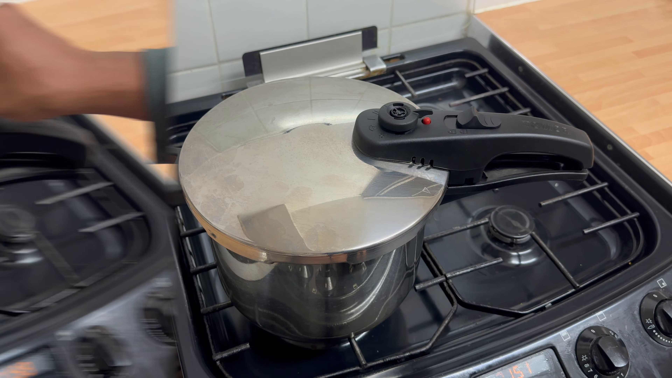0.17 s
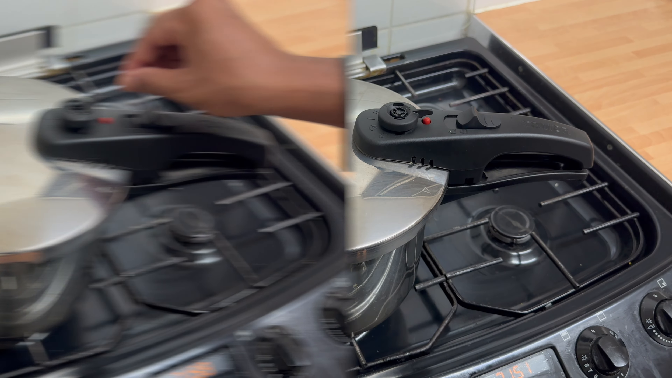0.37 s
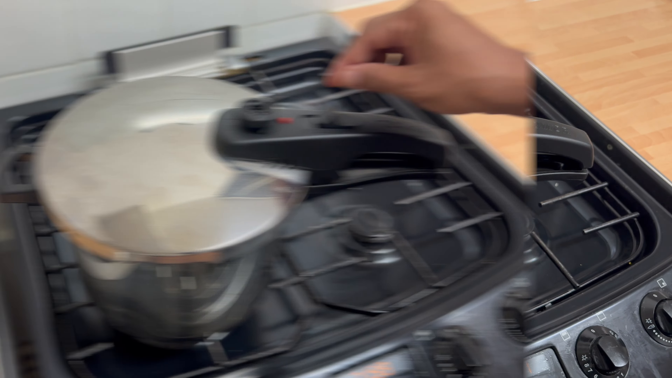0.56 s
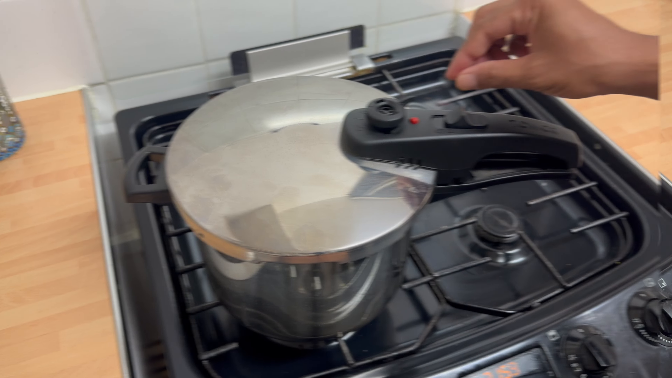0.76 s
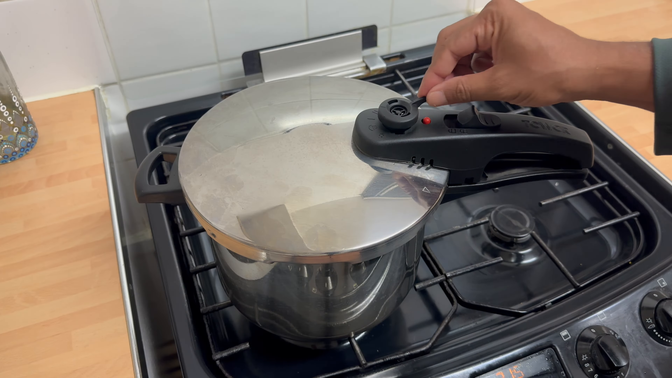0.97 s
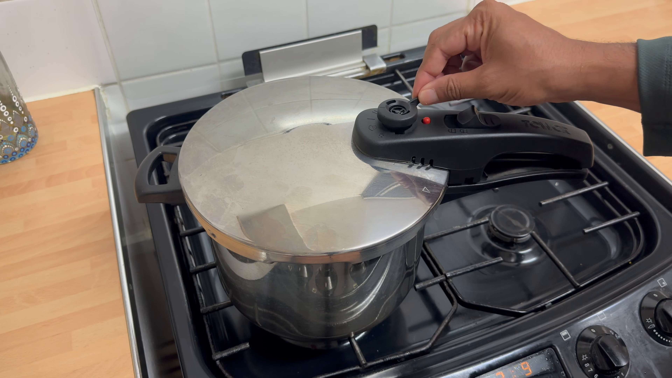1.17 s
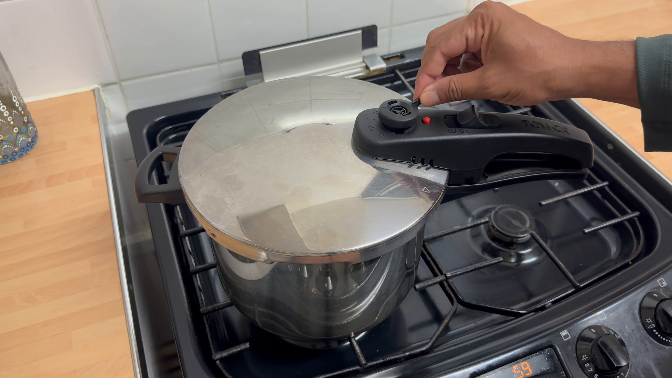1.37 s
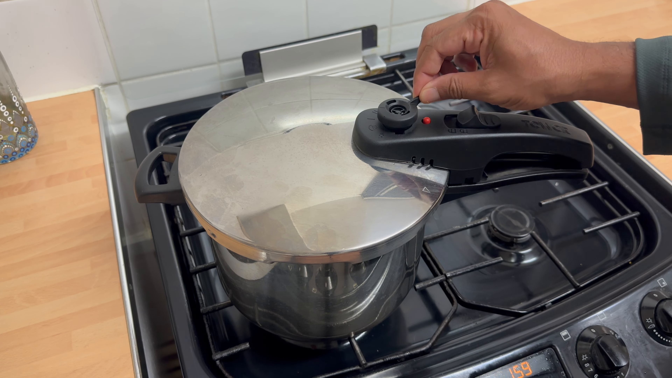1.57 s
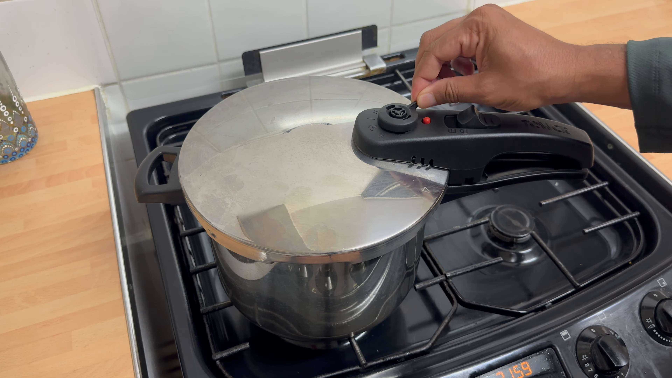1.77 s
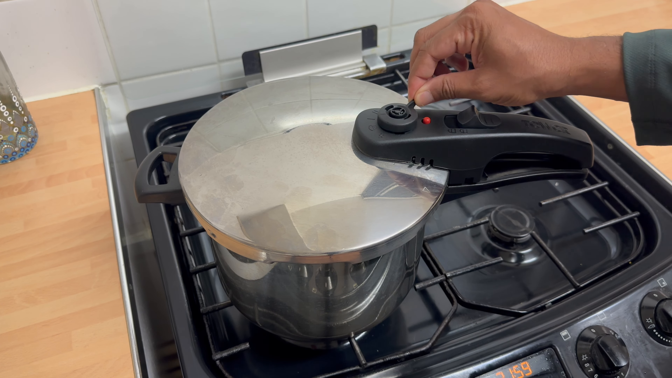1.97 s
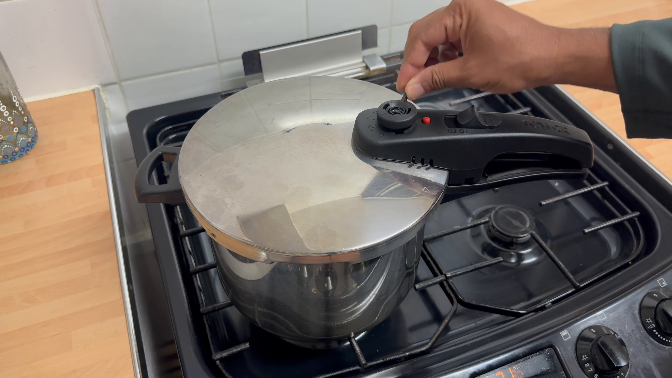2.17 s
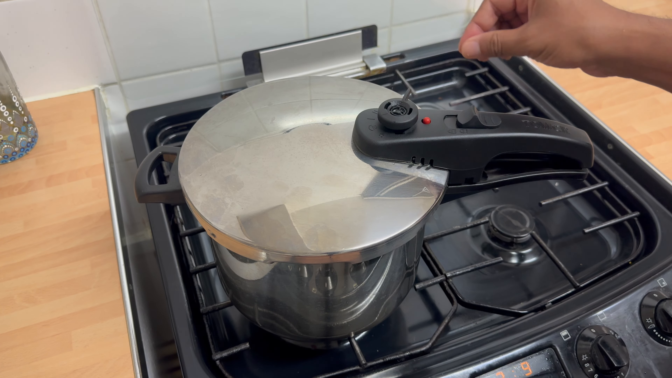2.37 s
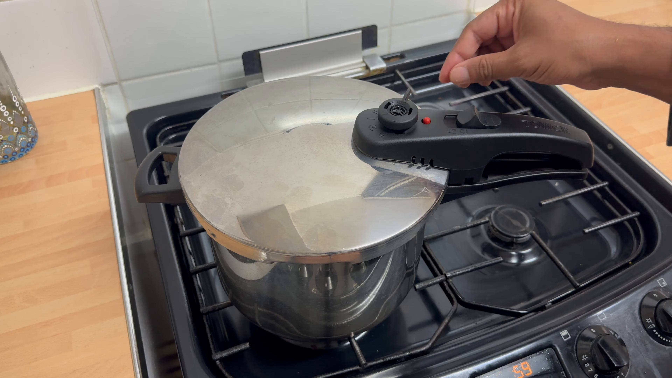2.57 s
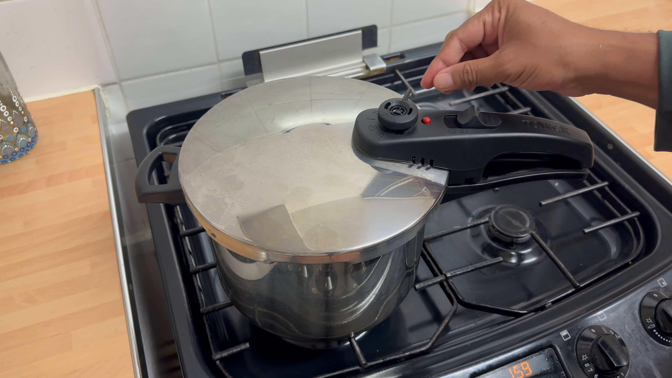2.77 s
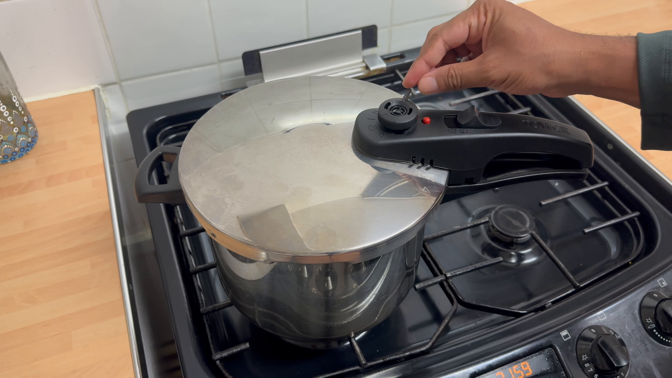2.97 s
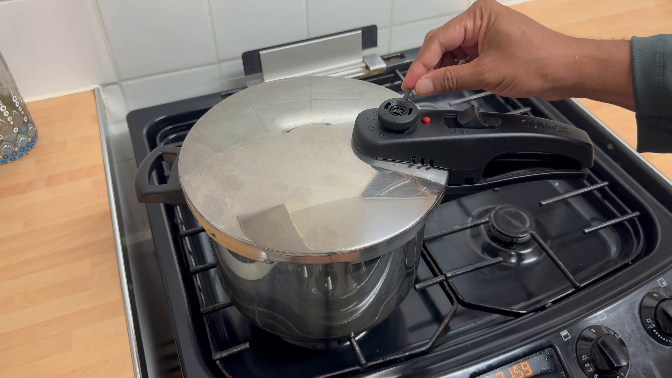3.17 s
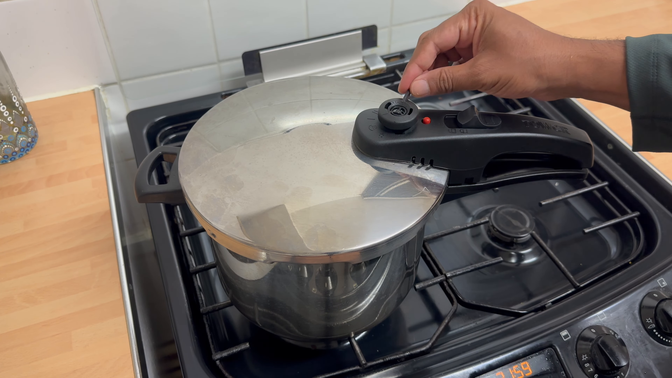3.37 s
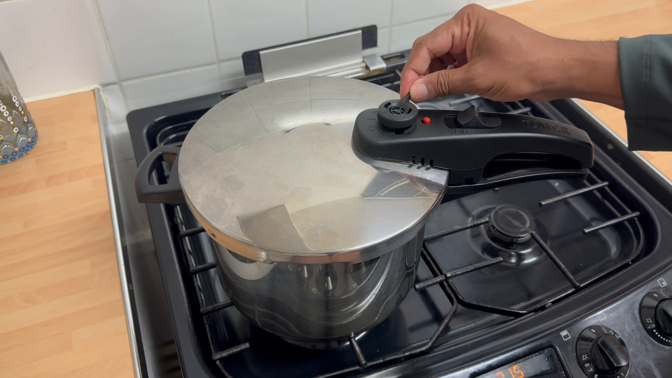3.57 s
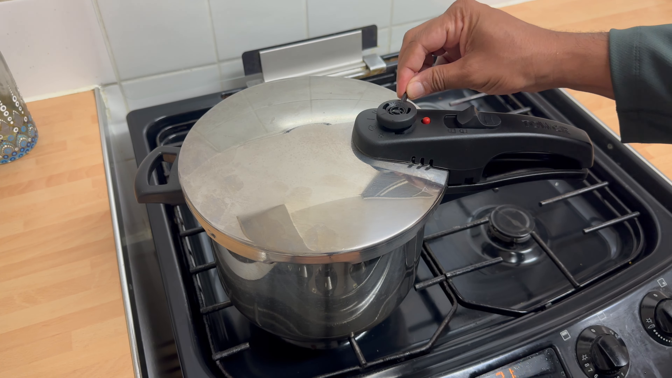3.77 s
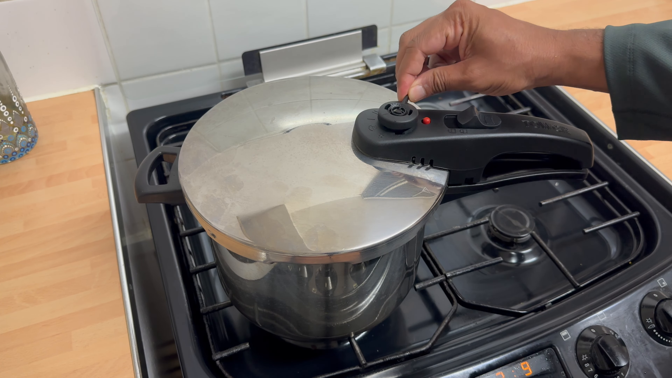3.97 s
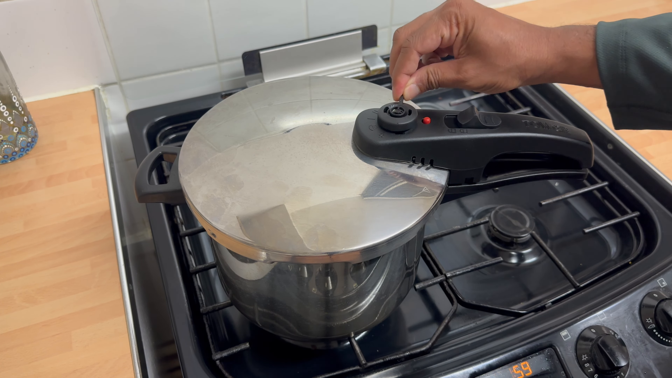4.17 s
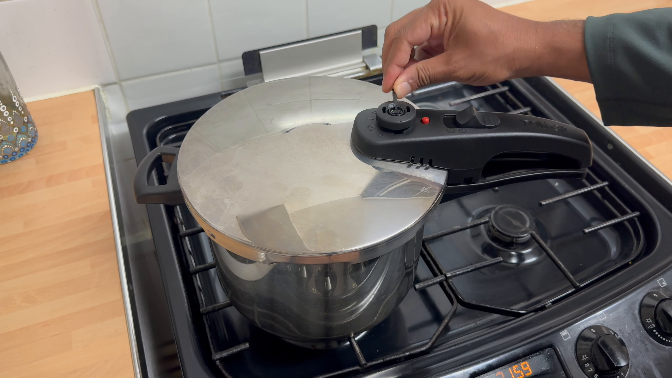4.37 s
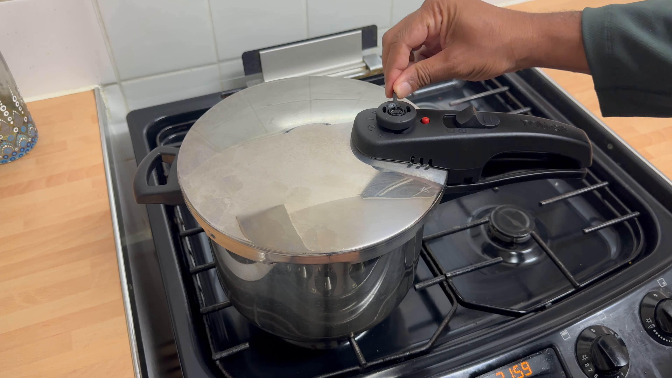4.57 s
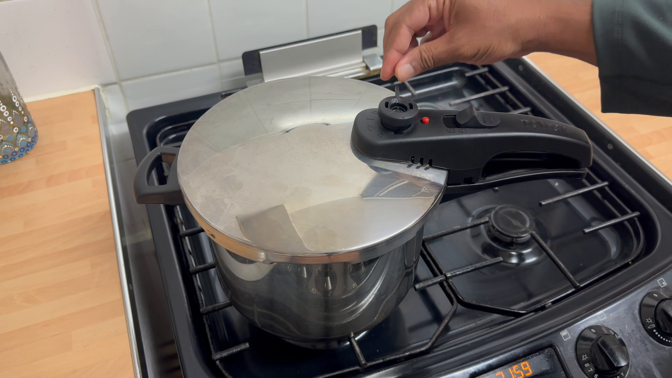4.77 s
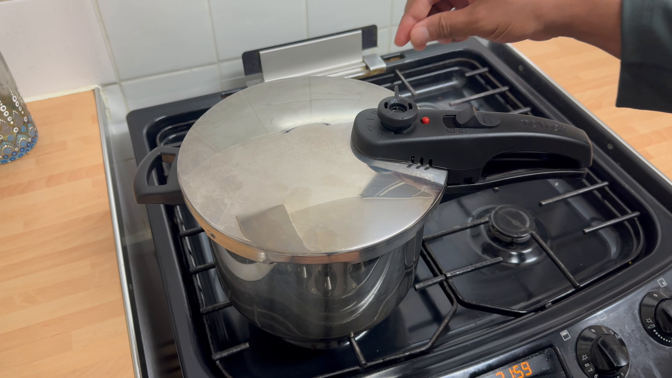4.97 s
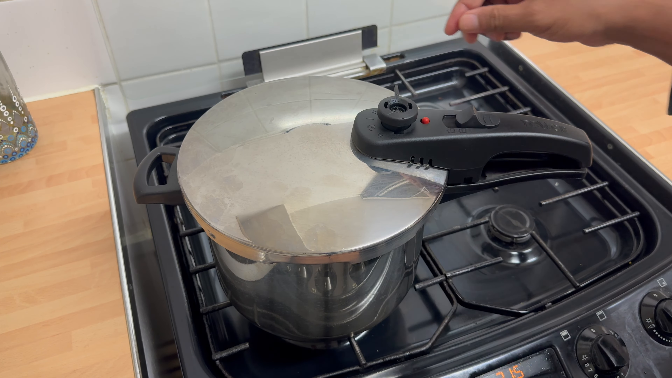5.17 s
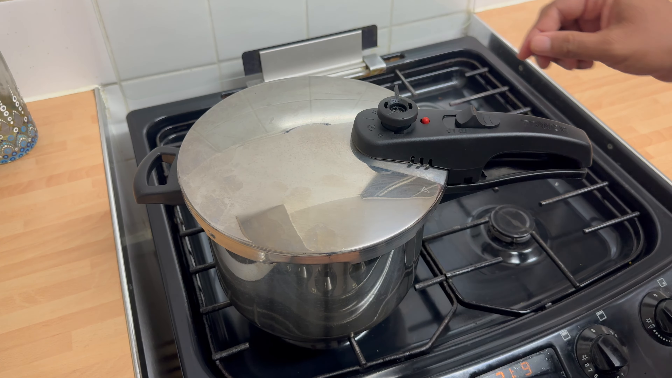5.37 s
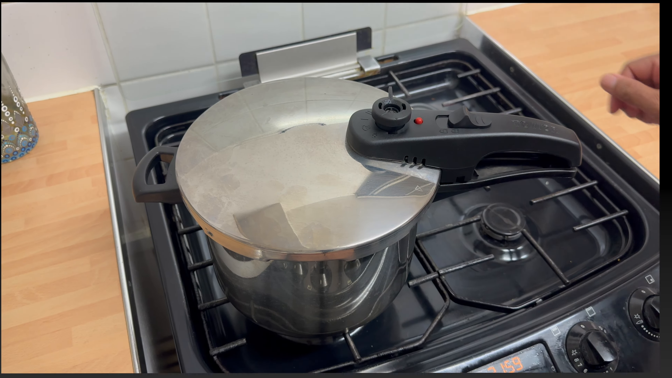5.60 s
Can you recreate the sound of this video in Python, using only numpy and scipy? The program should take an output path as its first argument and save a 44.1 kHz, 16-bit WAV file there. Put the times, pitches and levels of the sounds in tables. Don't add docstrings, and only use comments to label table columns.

```python
import sys
import numpy as np
from scipy import signal
from scipy.fft import rfft, irfft
from scipy.io import wavfile

SR = 44100
rng = np.random.default_rng(int(sys.argv[2]) if len(sys.argv) > 2 else 0)


def gain_from_db(level_db):
    decades = np.asarray(level_db, float) / 20
    return 10 ** decades


def store_pcm(level_fs):
    pcm = np.round(np.clip(level_fs, -1, 1) * 32767).astype(np.int16)
    wavfile.write(sys.argv[1], SR, np.atleast_2d(pcm).T)


N = 248616

# t/s, lift off its seat (about -2 to 2), turn of the cap, cover by the hand (each about -1
VALVE_POSE = [(0, -0.87, -0.61, -0.81), (.35, -0.93, -0.6, 0.23), (.75, -0.52, -0.74, -0.98),
              (1.15, -0.82, 0, 0.88), (1.3, -0.77, -0.12, 1), (1.42, -0.51, -0.12, 0.63),
              (1.65, -1.64, -0.3, 1), (1.87, -0.096, 0.66, 0.47), (2.0, -1.3, 0.28, 0.28),
              (2.05, 1.9, -0.43, -0.22), (2.19, 0.16, 0, 0.25), (2.4, 0.64, 0.18, -1.2),
              (3.4, 0.13, 0.4, -0.27), (3.7, -0.31, 0.35, -0.077), (4.35, -0.7, 0.2, 0.67),
              (4.62, -0.52, .4, -0.1), (4.76, 0.092, 0.67, 0.85), (5.64, 0.39, 1.1, 1)]


def rms_one(x):
    return x / np.sqrt(np.mean(x ** 2) + 1e-20)


def in_time(rows):
    s, *columns = np.transpose(rows)
    return [np.interp(np.arange(N) / SR, s, column) for column in columns]


def drift(rate):
    r = np.exp(-40 * np.pi * rate / SR)
    steps = rng.standard_normal(N // 20 + 2002)
    slow = signal.lfilter([1], [1, -2 * r, r * r], steps)[2000:]
    return np.interp(np.arange(N) / 20, np.arange(len(slow)), rms_one(slow - slow.mean()))


def resonance(x, hz, width_hz):
    r = np.exp(-np.pi * width_hz / SR)
    top = np.array([1, 0, -1]) * (1 - r * r) / 2
    return signal.lfilter(top, [1, -2 * r * np.cos(2 * np.pi * hz / SR), r * r], x)


def twice(x, hz, width_hz):
    return resonance(resonance(x, hz, width_hz), hz, width_hz)


def whistle(white, hz, width_hz):
    return rms_one(twice(white, hz, width_hz))


def ring(force, hz, t60):
    r, w = gain_from_db(-60 / (t60 * SR)), 2 * np.pi * hz / SR
    return signal.lfilter([0, np.sin(w)], [1, -2 * r * np.cos(w), r * r], force)


def coloured(spectrum):
    hz, db = np.transpose(spectrum)
    grid = np.maximum(np.arange(N // 2 + 1) * SR / N, 1)
    gain = gain_from_db(np.interp(np.log(grid), np.log(hz), db))
    return rms_one(irfft(rfft(rng.standard_normal(N)) * gain, N))


def echo(x, response):
    return signal.fftconvolve(x, response / np.sqrt(np.sum(response ** 2)))[:N]


def background():
    # f/Hz, level/dB per Hz
    room_tone = [(15, -47), (25, -4), (119, -1.5), (299, -7), (380, -3.5), (512, -0.5), (707, -10),
                 (831, -11), (1060, -39), (1180, -19), (1870, -13.5), (4800, -21.5), (6810, -27),
                 (15700, -27)]
    # f/Hz, level/dB rms
    hum_tones = [(73, -91.5), (122, -79.5), (244, -83.5)]
    t = np.arange(N) / SR
    hum = 0
    for hz, db in hum_tones:
        swell_db = 3 * drift(4)
        hum = hum + np.sqrt(2) * gain_from_db(db + swell_db) * np.sin(2 * np.pi * hz * t + 0.73 * drift(4.9))
    return gain_from_db(-70.5) * coloured(room_tone) + hum


def kitchen(x):
    tail_t60_s, tail_db = 0.2, -7.5
    hob_echo_s, hob_echo_db = 0.003, -9
    t = np.arange(SR // 2) / SR
    *near, tail = rng.standard_normal((4, len(t))) / np.sqrt(len(t))
    highs = signal.butter(2, 3000, "high", fs=SR, output="sos")
    turn = 1.6 * np.arange(N) / SR + 0.5 * drift(1.0)
    out = x + gain_from_db(tail_db) * echo(x, tail * gain_from_db(-60 * t / tail_t60_s) * (t > 0.006))
    for k, pattern in enumerate(near):
        pattern = signal.sosfilt(highs, pattern * np.exp(-t / hob_echo_s) * (t > 0.001))
        out += gain_from_db(hob_echo_db) * np.cos(turn + k * np.pi / 3) * echo(x, pattern)
    return out * gain_from_db(-2.0)


def ticks():
    # t/s, peak level/dB, f/Hz
    cap_ticks = [
        (0.79, -51, 1400),
        (1.14, -46, 1730),
        (1.6413, -37, 3220),
        (2.1923, -20.5, 3200),
        (2.9117, -29, 1330),
    ]
    out = np.zeros(N)
    for s, peak_db, hz in cap_ticks:
        burst = rng.standard_normal(2000) * np.exp(-np.arange(2000) / (0.0032 * SR))
        click = twice(burst, hz, 0.16 * hz)
        out[round(s * SR):][:2000] += gain_from_db(peak_db - 3.5) * click / np.abs(click).max()
    return out


def knocks():
    # t/s, low ring level/dB, middle ring level/dB, high ring level/dB, rattle level/dB
    touches = [(0.209, -70.5, -70, -73, -67), (0.355, -47.5, -61.5, -52.5, -44),
               (0.462, -60, -85, -64, -64), (0.917, -68, -72, -75, -73), (0.973, -60, -66, -66.5, -67),
               (1.428, -54, -62.5, -75, -58), (1.607, -66, -66, -77, -54), (1.629, -71, -61.5, -72, -63),
               (1.679, -55.5, -66, -65, -47), (1.699, -77, -77, -70, -53), (1.732, -59, -77, -68, -53),
               (2.2, -45, -51, -53, -45), (2.219, -60, -60, -45, -36), (3.427, -53.5, -61.5, -70, -42),
               (3.877, -52.5, -64, -48, -38), (4.294, -44, -49, -52, -44)]
    # f/Hz, level/dB, t60/s
    lid = [
        [(480.7, 5, 0.25), (444, 1.5, 0.14)],
        [(610.4, 9, 0.16), (606, -11, 0.074)],
        [(713, 3.5, 0.071), (826, 2, 0.047), (1520, 6, 0.21)],
    ]
    s, *ring_db, rattle_db = np.transpose(touches)
    at, out = np.round(s * SR).astype(int), np.zeros(N)
    for k, (modes, group_db) in enumerate(zip(lid, ring_db)):
        force = np.full(N, 1e-18)
        force[at] = gain_from_db(group_db + 1.5) * (-1) ** k
        for hz, db, t60 in modes:
            out += gain_from_db(db) * ring(force, hz, t60)
    force = np.zeros(N)
    force[at] = gain_from_db(rattle_db + 10.5)
    dying = signal.lfilter([1], [1, -np.exp(-1 / (0.012 * SR))], force)
    rattle = resonance(dying * rng.standard_normal(N) + 1e-18, 450, 550)
    return twice(out + rattle, 650, 1200)


def pushes(rows, opening_db_per_s):
    s, held, db, closing = np.transpose(rows)[:, :, None]
    t = np.arange(0, N + 32, 32) / SR
    after = np.maximum(t - s - held, 0)
    fall = closing * after + 68 * after ** 2
    level = db - opening_db_per_s * np.maximum(s - t, 0) - fall
    total = 10 * np.log10(np.sum(gain_from_db(np.maximum(2 * level, -400)), axis=0))
    return np.interp(np.arange(N) / SR, t, total)


def answer(rule):
    s, *pose = np.transpose(VALVE_POSE)
    return np.interp(np.arange(N) / SR, s, rule[0] + np.dot(rule[1:], pose))


def jet_gain():
    # fully open t/s, held/s, level/dB, closing/dB per s
    valve_pushes = [(0.0, 0.35, -48.5, 42), (0.29, 0.029, -58, 150), (1.147, .01, -52.5, 90),
                    (1.163, 0.11, -43.5, 76), (1.41, .03, -50.5, 198), (1.44, 0.0094, -48.5, 200),
                    (1.625, .02, -63, 206), (1.647, 0.013, -49, 210), (1.85, 0.16, -67.5, 200),
                    (1.9, .08, -64, 200), (1.982, .02, -65, 200), (2.0, 0.04, -45.5, 202),
                    (2.046, 0.12, -33.5, 90), (2.185, 0.023, -34.5, 124), (2.255, 0.012, -38.5, 122)]
    # t/s, level/dB
    flow = [(2.03, -90), (2.05, -43.5), (2.4, -42.5), (2.54, -41.5), (3.5, -40), (3.58, -35), (3.71, -34.5),
            (3.82, -35), (4.08, -37), (4.29, -32.5), (4.64, -36.5), (4.74, -33.5), (4.81, -40), (4.86, -39),
            (4.99, -38), (5.03, -39.5), (5.57, -40), (5.64, -40.5)]
    pushed = gain_from_db(pushes(valve_pushes, 850))
    return np.sqrt(pushed ** 2 + gain_from_db(in_time(flow)[0]) ** 2 + gain_from_db(-93) ** 2)


def rush():
    # f/Hz, level/dB per Hz
    rush_colour = [(71, -42), (120, -17), (161, -19), (247, -8), (309, -13), (435, -7.5), (661, -6),
                   (692, -2.5), (1100, -3), (1430, -19), (2420, -120)]
    # t/s, held/s, level/dB, fading/dB per s
    rubs = [
        (0.0, 0.46, -73, 90),
        (.55, .25, -81, 84),
        (.85, .25, -71, 90),
        (1.43, .04, -68, 168),
        (1.63, .13, -70, 200),
        (1.86, .14, -78, 90),
    ]
    plume = jet_gain() * gain_from_db(answer((-18.5, 6, -3.5, 1.15)))
    level = np.hypot(plume, gain_from_db(pushes(rubs, 207)))
    return level * gain_from_db(1.86 * drift(46.0)) * coloured(rush_colour)


def passage(modes, gust, patchy_db, tilt_db=0, arch_db=0):
    white = rng.standard_normal((2, N))
    centre_hz, out = np.mean(modes, axis=0)[0], 0
    for k, (hz, width_hz, db) in enumerate(modes):
        band = twice(white[k % 2], hz, 1.5 * width_hz)
        octaves = np.log2(hz / centre_hz)
        shape_db = tilt_db * octaves - arch_db * octaves ** 2
        out = out + band * gain_from_db(db + gust + patchy_db * drift(5.8) + shape_db)
    return rms_one(out)


def jet(gust, turn):
    # f/Hz, width/Hz, level/dB
    mouth = [(5990, 310, -5.5), (6200, 390, -3), (6640, 820, -1), (7410, 325, -0.5), (7644, 500, -1.5),
             (8520, 910, -7)]
    shut = np.minimum(turn, 0)
    tilt_db = answer((1.1, -2, 1.5, -3.5)) + 14 * shut
    return passage(mouth, gust, patchy_db=0.23, tilt_db=tilt_db, arch_db=-20 * shut)


def chamber(gust):
    # f/Hz, width/Hz, level/dB
    hollows = [(1144, 160, -11), (1331, 120, 2), (1488, 156, -2.5), (1665, 140, -1.5), (1798, 207, -7.5),
               (2015, 254, -12)]
    return passage(hollows, gust, patchy_db=0.37, tilt_db=answer((1.5, 1.2, -0.8, 2.5)))


def stem(gust):
    # f/Hz, width/Hz, level/dB
    hollows = [(2533, 240, -7.5), (2734, 286, -2.5), (3050, 222, 2.5), (3407, 250, -3), (3750, 130, -3.5),
               (4250, 420, -3.5), (4446, 210, -4), (4780, 660, -3.5)]
    level_db = answer((-6.5, 3, 1.5, 0.73))
    return gain_from_db(level_db) * passage(hollows, gust, patchy_db=-1.0, tilt_db=answer((2.5, -2.5, -5.5, -0.7)))


def spray(gust):
    # f/Hz, width/Hz, level/dB
    bands = [(10480, 2400, 0.5), (12150, 2300, -1), (12800, 1760, -0.5), (14300, 920, -3),
             (15040, 800, -4.5)]
    # t/s, wetness (about -1 to 1)
    wetness = [(0, -.3), (1.1, 0.22), (1.25, 0.28), (1.4, 1), (1.47, .3), (1.56, -0.84), (1.66, 0.48),
               (1.79, -1.2), (1.85, .9), (1.95, 0.91), (2.0, -0.018), (2.4, 0.2), (3.5, -0.38),
               (4.3, -0.13), (4.65, 0.044), (4.85, 0.29), (5.64, 0.13)]
    wet, = in_time(wetness)
    level_db = answer((-6.5, 0.3, 1.5, -0.1)) + 7 * wet
    tilt_db = answer((-2, -2, -1, -1.5)) + 16 * wet
    arch_db = answer((4, -6, 33, 32)) + 21 * wet
    return gain_from_db(level_db) * passage(bands, gust, patchy_db=-1.6, tilt_db=tilt_db, arch_db=arch_db)


def whistles(lift, turn):
    # f/Hz, width/Hz, level/dB beside the jet
    lid_metal = [(1425, 50, -25.5), (6104, 21, -19), (6540, 55, -33), (6765, 370, -15.5), (7130, 53, -16.5),
                 (7660, 55, -28), (7600, 40, -52)]
    white = rng.standard_normal(N)
    pip_db = -6 - 220 * np.abs(np.arange(N) / SR - 4.975)
    gap_db = np.maximum(-32 + np.maximum(-32 * turn, 10 * turn), pip_db)
    out = gain_from_db(gap_db + drift(6.1)) * whistle(white, 4174, 55)
    ridge_db = np.minimum(-30 - 30 * turn, -5)
    out = out + gain_from_db(ridge_db) * whistle(white, 6400, 600)
    seat_db = answer((-25.5, -2.5, 13, 7)) + 1.8 * drift(29.0)
    out = out + gain_from_db(seat_db) * whistle(white, 3157, 195)
    collar_db = answer((-17.5, 4.8, -2, 6.5))
    out = out + gain_from_db(collar_db) * whistle(white, 3443, 160)
    for hz, width_hz, db in lid_metal:
        level_db = db - 6 * lift + 1.2 * drift(0.57)
        out = out + gain_from_db(level_db) * whistle(white, hz, width_hz)
    return out


def steam():
    lift, turn, _ = in_time(VALVE_POSE)
    strength = jet_gain()
    gust = 0.42 * drift(4.4) + 0.7 * drift(77.0)
    hiss = jet(gust, turn) + stem(gust) + spray(gust)
    depth = np.clip(answer((-0.055, 0.19, -0.32, 0.71)), -1, 0.65)
    hiss = hiss - depth * resonance(hiss, 14100, 490)
    hiss = hiss + whistles(lift, turn)
    chamber_level = np.hypot(strength * gain_from_db(answer((-6.5, 2.5, -0.54, -1.5))), gain_from_db(-74.5))
    return strength * hiss + chamber_level * chamber(gust)


def scene():
    mono = kitchen(steam() + rush() + knocks() + ticks()) + background()
    return np.array([mono, mono])


def top_cut(x):
    return signal.sosfilt(signal.butter(12, 16860, fs=SR, output="sos"), x)


def record(dry):
    low_pass = signal.ellip(12, 0.3, 80, 15740, fs=SR, output="sos")
    return top_cut(signal.sosfilt(low_pass, dry))


dry = scene()
out = record(dry)
store_pcm(out)
```